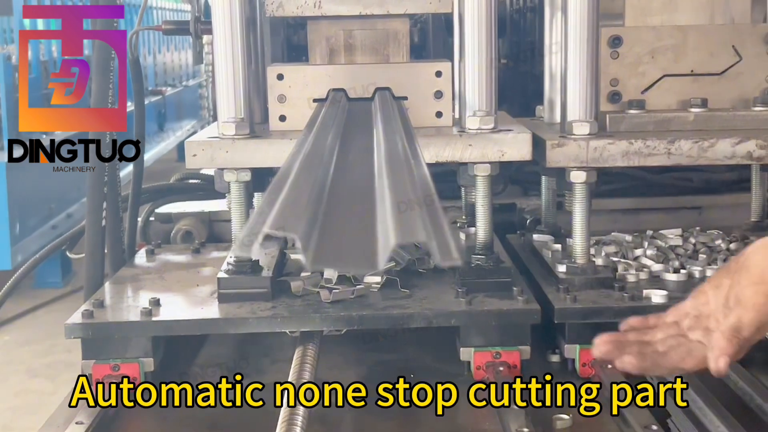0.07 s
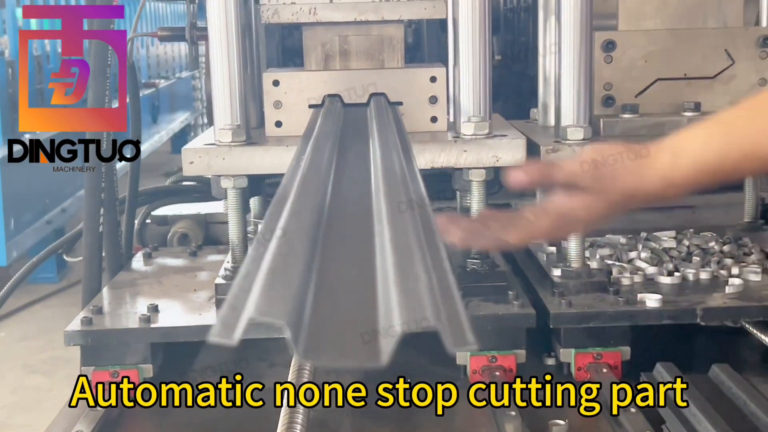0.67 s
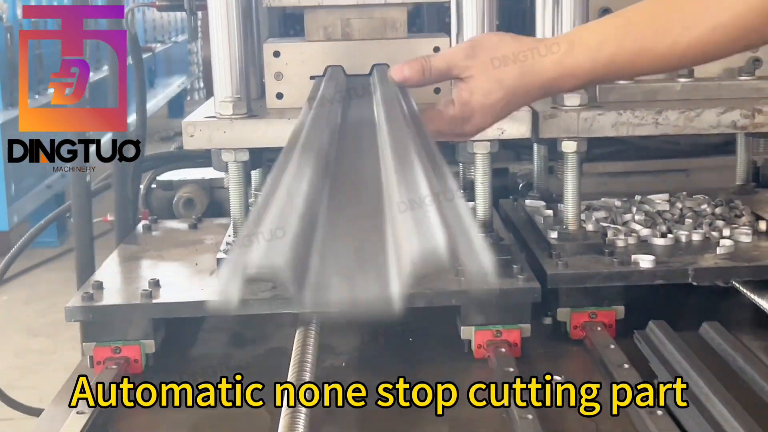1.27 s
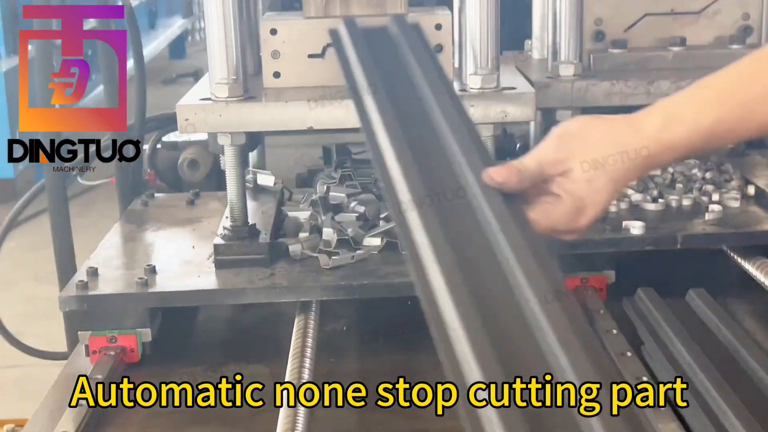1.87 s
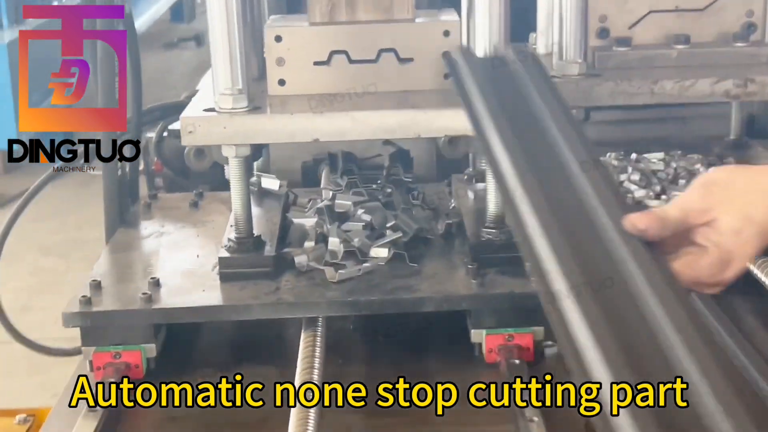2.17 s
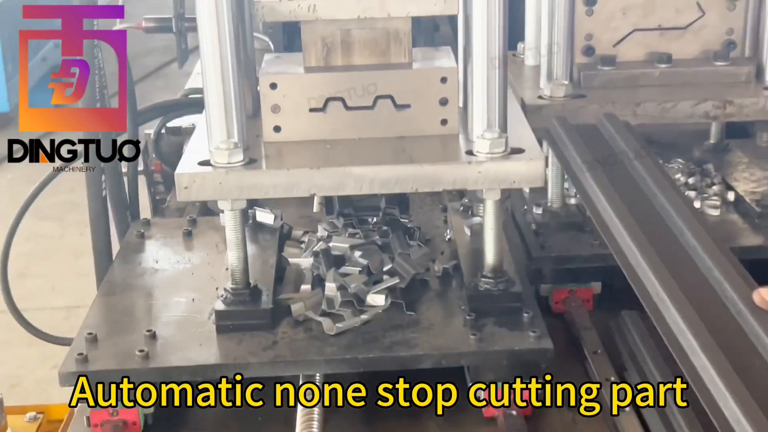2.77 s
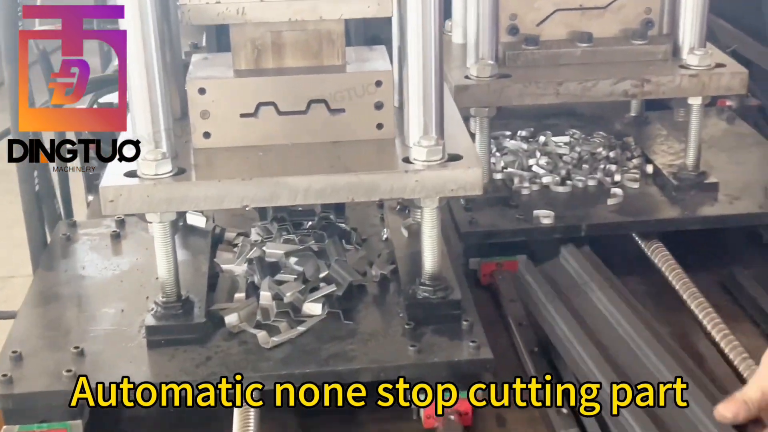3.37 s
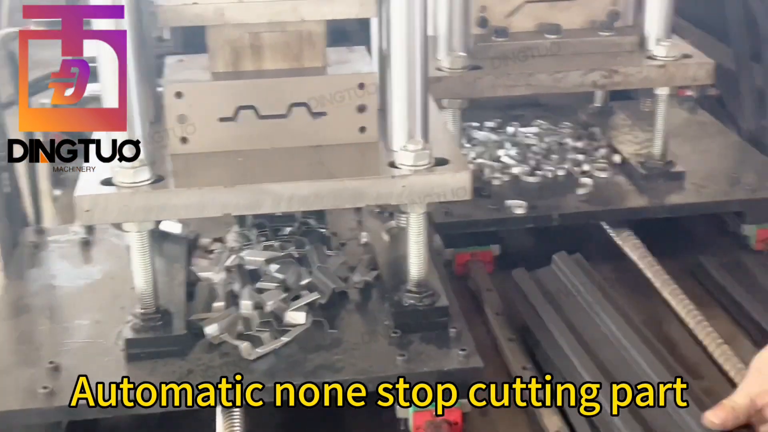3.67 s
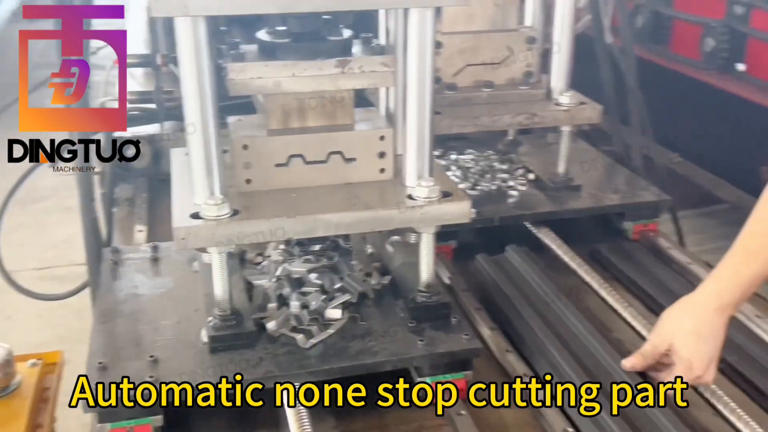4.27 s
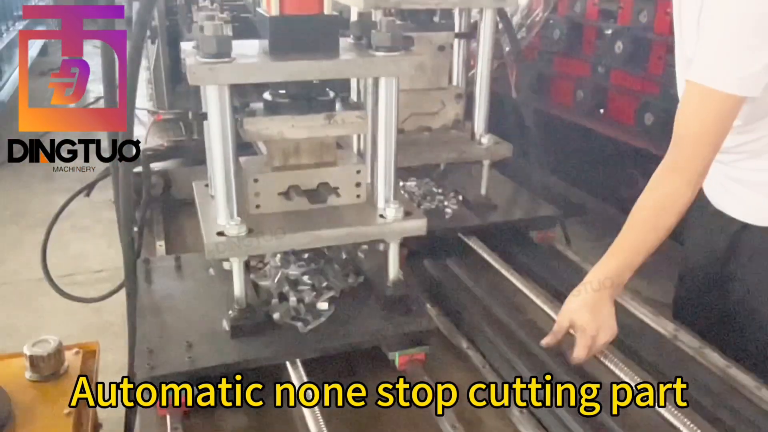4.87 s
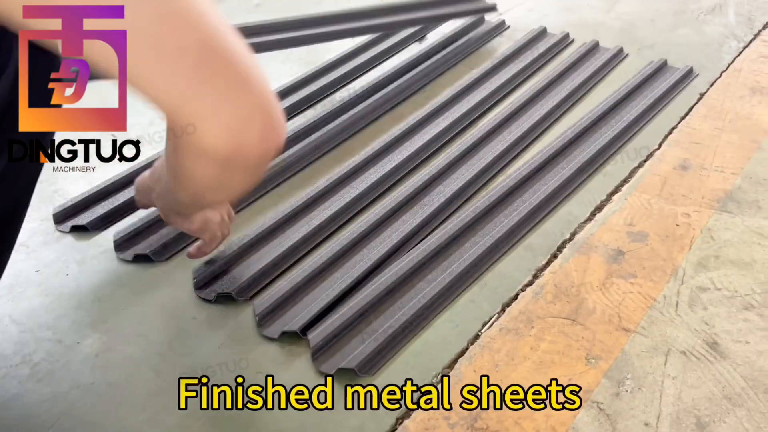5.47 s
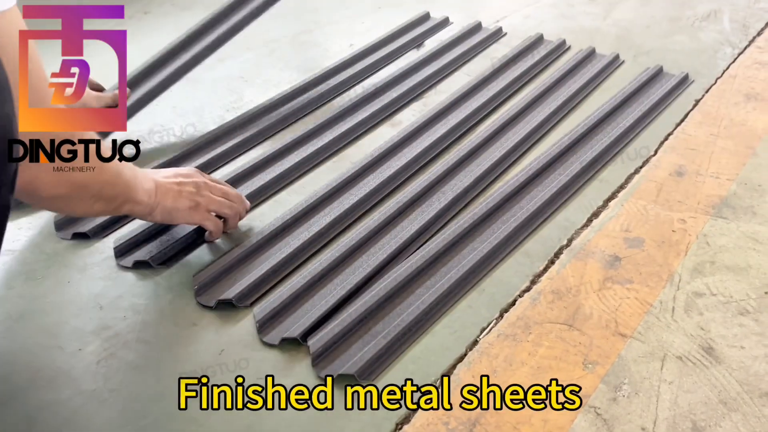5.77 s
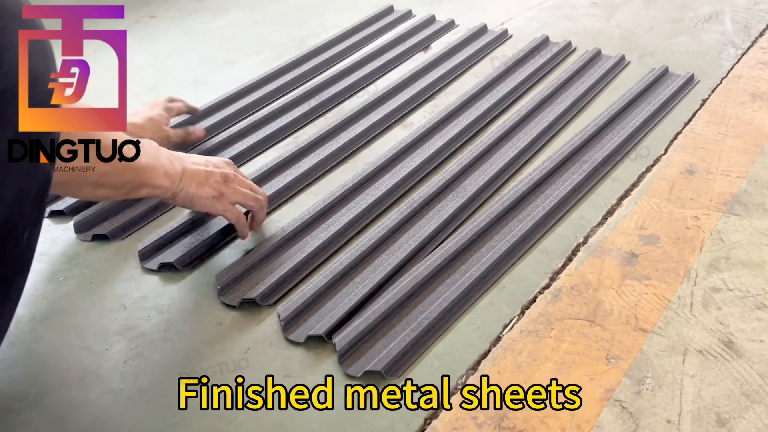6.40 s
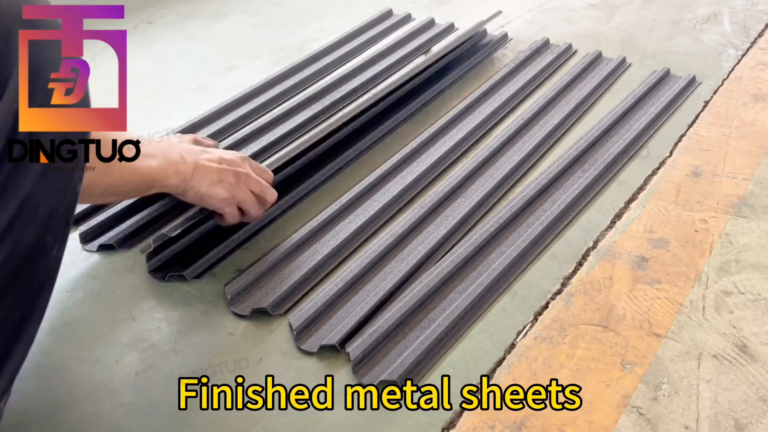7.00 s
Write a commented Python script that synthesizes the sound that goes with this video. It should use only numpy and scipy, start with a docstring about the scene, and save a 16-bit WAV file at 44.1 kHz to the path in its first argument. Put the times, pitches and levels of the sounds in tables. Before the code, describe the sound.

A machine pump drones as a press thuds through steel and metal knocks, then metal strips scrape and clatter onto concrete.

```python
"""Close to a roll forming line in a factory hall, a nine-piston pump drones and steel hisses out of the die.
The press thuds through the profile, the ram groans back up and the cut length knocks against the frame.
The pump idles while the microphone is walked to the run-out table. At 5 s the scene changes to a stack
elsewhere in the hall: profiles squeal over each other and drop on the concrete, echoing off far walls."""
import sys
import numpy as np
from scipy import signal
from scipy.fft import rfft, irfft, next_fast_len
from scipy.io import wavfile

SR = 44100
rng = np.random.default_rng(int(sys.argv[2]) if len(sys.argv) > 2 else 0)


def wav_out(sig):
    """Save sig, one row per channel (or a flat mono array), as 16-bit PCM at SR to the path in sys.argv[1]."""
    wavfile.write(sys.argv[1], SR, np.round(np.clip(np.atleast_2d(sig).T, -1, 1) * 32767).astype(np.int16))


N = 319284
TIME = np.arange(N) / SR
SHAFT_HZ, PISTONS = 24.965, 9
FEED_SLOWS_S, CUT_S = 0.45, 1.136
WALK_S, STACK_S = 3.15, 5.0   # the microphone leaves the die; it stands beside the stack

# Strong pump tones; standing waves favour different ones at each spot. Each row: multiple of shaft speed,
# then level in dB under load, idling at the die and idling at the run-out table.
PUMP_TONES = [(9, -36.5, -48, -40.5), (10, -45, -60, -55), (12, -45, -58, -52), (16, -38.5, -51, -41.5),
              (17, -48, -58, -49), (18, -40.5, -70, -39), (19, -45, -52, -47), (21, -40.5, -50.5, -47.5),
              (22, -49.5, -66, -56), (24, -51, -66, -68), (25, -51, -68, -55.5), (26, -49.5, -66, -68),
              (27, -46, -54, -47.5), (28, -47, -53, -52), (29, -49, -56, -49.5), (34, -48.5, -58, -54),
              (35, -42, -58, -49.3), (36, -47, -51, -52), (37, -62, -58, -70), (38, -51, -69, -55),
              (39, -55, -68, -56), (45, -57, -66, -53), (54, -54, -66, -57), (63, -60, -63, -70),
              (70, -47, -65, -57), (72, -49, -68, -63), (90, -61, -61, -64), (91, -54, -75, -65),
              (99, -51, -63, -59), (107, -61, -64, -68), (108, -56, -56, -56.5), (109, -57, -68, -56.5),
              (115, -53, -72, -69), (116, -52, -70, -66), (117, -52, -69, -64), (118, -53, -60, -63),
              (119, -60, -67, -71), (124, -60, -68, -69), (126, -55, -67, -66), (127, -52, -62, -68),
              (128, -56, -64, -66), (129, -56, -61, -63), (136, -59, -69, -65), (143, -55, -66, -63),
              (144, -56, -63, -62), (145, -51, -63, -63), (146, -64, -72, -62), (152, -60, -66, -68),
              (153, -58, -65, -70), (154, -51, -62, -66), (155, -50, -66, -67), (161, -56, -64, -68),
              (162, -58, -68, -68), (163, -58, -64, -67)]
# Where the pump's tones sit between the microphones. Each row: frequency in Hz, left minus right in dB.
PUMP_PAN = [(60, 0.5), (110, 0.5), (200, 5.5), (380, 2), (700, 7.5), (1290, -4.5), (2380, -0.5),
            (4400, 0.0), (8120, 0.0), (15000, 0.0)]
# When in a shaft turn a piston tone throbs. Each row: frequency in Hz, share of a turn.
THROB_AT = [(225, .4), (450, 0), (675, .54), (900, .6), (2700, .53), (3600, .4), (3825, .62), (4050, .55)]
# How far side tones stray from that step, lightening the throb. Each row: frequency in Hz, phase in cycles.
THROB_STRAY = [(225, .03), (400, .15), (550, .15), (675, .05), (900, .05), (2700, .36), (3500, .3),
               (3800, .08)]
# Thin whistles of the line. Each row: pitch in Hz, level in dB at the die and at the run-out table.
WHISTLES = [(5960, -81, -58), (7192, -80, -60), (7413, -78, -82), (11461, -78, -68), (13480, -81, -63.5)]

# Blows on steel. Each row: start in seconds, level in dB, brightness in dB per octave, ring length factor,
# resonance of the struck spot in Hz.
PRESS_BLOWS = [(1.165, -19.5, 3, 0.44, 520), (1.171, -8, -1.5, 1.3, 538), (1.192, -20.5, 4, 1.7, 226),
               (1.216, -15.5, 2, 1.25, 365), (1.227, -12.5, 2, 1.13, 143), (1.7065, -20, 3.5, 0.91, 223),
               (1.713, -19.5, 2, 0.68, 420), (1.735, -25.5, -10, 3, 62.3), (1.795, -29, -10, 1.9, 64)]
SHEAR_BLOWS = [(1.158, -24.5, 12.5, 0.64, 6000), (1.2405, -11.5, 7.5, 0.39, 2120),
               (1.258, -21.5, 4.4, 1.5, 1800)]
FRAME_KNOCKS = [(1.463, -27.5, 17, 0.84, 6900), (1.6645, -16, 4.5, 1.1, 2440),
                (1.708, -23.5, 9, 0.52, 2150), (2.0185, -22.5, 1, 0.42, 1250),
                (2.2137, -4.5, 0.5, 0.25, 2300), (2.2150, -7.5, -1, 0.18, 1070),
                (2.2205, -15.5, -1, 0.54, 2250), (2.2975, -25, -4, 0.89, 2550), (2.381, -41, -8, 1.5, 2640),
                (2.495, -34.5, -0.5, 2.3, 1340), (2.512, -29.5, -4.5, 0.89, 2560),
                (2.684, -27, -1.5, 0.9, 2470), (3.451, -28.5, -2, 1.35, 1520),
                (3.8035, -28, -2.5, 0.89, 1580), (3.830, -29, -1, 0.76, 2040),
                (3.862, -28.5, -2, 0.75, 1730), (4.315, -35.5, -3, 1.4, 1100), (4.39, -36, 0.5, 1.6, 1090)]
FLOOR_LANDINGS = [(5.783, -33.5, 7.5, 2, 6800), (5.876, -35.5, 7.5, 4.3, 6660),
                  (5.9608, -10.5, 4.5, 0.44, 1300), (5.9625, -15, -4, 0.42, 1300),
                  (5.9802, -15, 1, 0.48, 3180), (6.002, -22.5, 5, .4, 1300), (6.063, -25.5, 6, .6, 1300),
                  (6.1355, -16, 0, 0.75, 1250), (6.1535, -13, 2.5, 0.53, 2700),
                  (6.1755, -17.5, 2, 0.45, 1300), (6.1815, -8.5, -1, 0.4, 1050),
                  (6.199, -13, 2, 0.64, 2250), (6.217, -13.5, -1.5, 0.69, 1250),
                  (6.2245, -19, 2, 0.43, 1490), (6.230, -16, -2.5, 1.4, 1304),
                  (6.246, -20.5, -1, 1.0, 1350), (6.264, -21.5, 0, 1.26, 2330),
                  (6.811, -22.5, 1, 0.47, 1090), (6.8142, -19.5, 1.5, 0.72, 4020),
                  (6.8334, -22.5, 0, 0.69, 2500), (6.851, -24.5, -0.5, 0.67, 4400),
                  (6.862, -28, -3, 0.64, 1300), (6.958, -30, -2.5, 0.59, 2370), (7.061, -26, -8, 1.3, 860),
                  (7.101, -27.5, .5, .76, 1800), (7.1212, -17.5, -1.5, 0.51, 1970),
                  (7.129, -25, 1, 0.52, 1300), (7.141, -22.5, 0, 0.73, 1960)]
# Hydraulic strokes, ram up and then carriage back. Each row: at speed and stopping in seconds,
# groan level in dB, frame rumble level in dB.
STROKES = [(1.303, 1.636, -28, -29.5), (1.83, 1.95, -34.5, -30.5)]
# Spells of friction. Each row: at full strength and letting go in seconds, level in dB.
CUT_END_RUBS = [(1.492, 1.53, -36.5), (1.596, 1.66, -28.5), (1.86, 2.186, -40)]
EDGE_SQUEALS = [(4.997, 5.05, -37), (5.12, 5.22, -50), (5.286, 5.467, -38.5), (5.585, 5.606, -40)]

# Spectra as heard from close by. Each row: frequency in Hz, relative level in dB.
BUZZ_COLOUR = [(1200, -17), (1500, 5), (1800, 10), (2200, 0.5), (3000, 4), (3800, -4), (4400, -1.5),
               (6000, -12)]   # the pump's weak high tones
RATTLE_COLOUR = [(3300, -38), (3580, 5), (3720, -7), (3900, -1), (4100, -2), (4300, -32)]   # a loose part on the pump
OIL_COLOUR = [(1200, -7), (1800, 1), (2500, 1), (3200, -2), (4500, -5.5), (6000, -17)]   # oil rushing through the valves
FEED_COLOUR = [(1200, -8.5), (1800, 0), (3000, -2), (5000, -1), (7500, 0.5), (10000, -7), (12500, -6.5),
               (15000, -10.5)]   # steel in the die
PRESS_COLOUR = [(30, -25), (60, 1), (130, 8.5), (300, 3.5), (520, 5.5), (750, 0), (1200, -8), (2500, -20),
                (6000, -50), (14000, -46)]   # dense modes of the press
KNOCK_COLOUR = [(300, -34), (600, 0), (950, -3.5), (1600, -5), (2300, 2.5), (3300, -4), (4500, -5.5),
                (6500, -14.5), (10000, -21), (14000, -23)]   # dense modes of the cut length
DROP_COLOUR = [(120, -29), (300, -18), (600, -9.5), (1000, -4), (1300, -2), (1800, -7), (2600, -7),
               (4500, -18), (7500, -20), (10000, -27), (14000, -20.5)]   # dense modes of a dropped profile
RUMBLE_COLOUR = [(25, -34), (40, -20), (60, 2), (90, -11.5), (170, -18.5), (350, -4.5), (550, -10),
                 (900, -30), (2000, -21.5)]   # the shaking frame
RUB_COLOUR = [(500, 1), (900, -16), (1600, 2), (2400, 0.5), (2900, -14), (4400, -10), (6000, -12.5),
              (14000, -27)]   # the cut end scraping
LINE_ROOM_TONE = [(25, -27), (40, -6.5), (60, 7.5), (100, -3.5), (220, -2.5), (330, -2.5), (500, -0.5),
                  (800, -3.5), (1100, -6), (2200, -10.5), (3600, -19.5), (5000, -19.5), (9000, -23.5),
                  (12500, -20), (15000, -25)]   # the hall beside the machine
STACK_ROOM_TONE = [(25, -19), (45, -9), (80, 2.5), (120, 4.5), (165, -4), (225, 3), (380, 1.5), (700, -2),
                   (1300, -3.5), (2500, -11.5), (5000, -24), (9000, -30), (13000, -30.5), (15000, -32)]   # the hall beside the stack

# Clear modes of the steel. Each row: frequency in Hz, relative level in dB, nominal t60 in seconds.
PRESS_MODES = [(65.5, -12, 0.22), (126, -1.5, 0.11), (226, -0.5, 0.14), (365.5, -8.5, 0.23),
               (510.4, -2, 0.12)]
CLAMPED_MODES = [(880, 1.5, 0.22), (1233, -5.5, 0.3), (1620, 2, 0.17), (1960, -8.5, 0.14), (2373, -15, 0.2),
                 (2510, -28, 0.35), (2580, -22, 0.25), (4050, -37, 0.18), (4760, -23, 0.23)]   # the profile held in the die
KNOCK_MODES = [(876, -3, 0.15), (1240, -5, 0.2), (1328, -1, 0.19), (1028, -10, 0.14), (1550, -20, 0.2),
               (2080, -14, 0.08), (3310, -12, 0.09), (2230, -20, 0.1), (2520, -13, 0.18), (2570, 1, 0.091),
               (4140, -9, 0.18)]
RUB_MODES = [(682, -0.5, 0.17), (863, -1, 0.18), (1140, -16, 0.24), (1235, -3, 0.2), (1300, -4, 0.18),
             (1615, -6, 0.17), (2340, -5.5, 0.11)]
SQUEAK_MODES = [(2140, -6.5, 0.053), (2500, -6, 0.041), (3240, -22.5, 0.097)]
DROP_MODES = [(1306, -5, 0.12), (1350, -3, 0.17), (1588, -6, 0.12), (1846, -7, 0.1), (2030, -7, 0.13),
              (2440, -9, 0.19), (2790, -10, 0.1), (3217, -7, 0.098), (3530, -17, 0.12), (4120, -17, 0.22),
              (4520, -17, 0.11), (5220, -26, 0.23), (7040, -31, 0.2), (8230, -27, 0.25)]
SLIDE_MODES = [(1387, 6, 0.15), (2860, -5, 0.21), (5030, -18, 0.18), (5190, -12, 0.23), (5750, -30, 0.11),
               (7040, -21, 0.12)]

# How alike the two microphones hear near sources and the diffuse hall.
# Each row: frequency in Hz, likeness from 0 to 1.
NEAR_LIKENESS = [(60, .997), (130, .985), (290, .88), (640, .82), (1400, .8), (3000, .95), (7000, .9),
                 (15000, .85)]
DIFFUSE_LIKENESS = [(60, 0.98), (130, 0.98), (290, 0.89), (640, 0.2), (1400, 0), (3000, 0.46), (7000, 1),
                    (15000, 1)]
# The two microphone ports. Each row: frequency in Hz, left minus right in dB, left's lead in radians.
PORT_MISMATCH = [(100, 0, 0), (398, .5, 0.26), (700, 1, 0.67), (870, 4, 1), (1250, 0.5, 1.04),
                 (1464, -2.5, 2), (1520, -8, 3.5), (1670, -3, 5), (1900, -0.5, 6.5), (2500, 0.5, 6.5),
                 (3980, 0.5, 6), (6900, -0.5, 6.5), (8470, 3.5, 5), (10540, -11, 1.5), (11830, 10, 1.73),
                 (12000, -2, 0.2), (13400, -1, 1.8), (14900, 0, -2.5)]


def pump():
    """Nine unequal pistons drone and buzz, a loose part rattles each turn and oil rushes under load."""
    turns = SHAFT_HZ * TIME + 0.000075 * drift(3.8)
    swell = np.cos(2 * np.pi * (turns - THROB_AT[-1][1]))
    buzz = from_db(-6 + 0.7 * swell) * pump_buzz(turns)
    rattle = from_db(-11 + 6 * (swell - 1)) * noise(RATTLE_COLOUR)
    oil = from_db(-4) * noise(OIL_COLOUR)
    # buzz and rattle drop out at the cut, then build up to their idling level
    working = held(-34, FEED_SLOWS_S, CUT_S, rise_db_per_s=37, fade_db_per_s=130)
    idling = held(-46.5, 2.0, STACK_S, rise_db_per_s=38, fade_db_per_s=129)
    return pump_drone(turns) + (working + idling) * (buzz + rattle) + working * oil


def pump_drone(turns, crest_order=36, crest_db=-49, crest_s=3.86, crest_half_s=0.33):
    """The strong tones follow load and microphone position; the walk crosses one standing wave's crest."""
    load, way = pump_load(), way_walked()
    orders, *spots_db = np.transpose(PUMP_TONES)
    levels_db = np.array([*spots_db, np.where(orders == crest_order, crest_db, -np.inf)])
    stray = at_hz(THROB_STRAY, orders * SHAFT_HZ)
    loaded, at_die, at_table, crest = shaft_tones(orders, levels_db, turns, stray)
    near_crest = np.exp(-((TIME - crest_s) / crest_half_s) ** 2)
    idle = (1 - way) * at_die + way * at_table + near_crest * crest
    return load * loaded + (1 - load) * idle


def pump_buzz(turns, uneven_db=5):
    """Weak, uneven shaft harmonics between and above the strong tones; rms 1."""
    orders = np.arange(11, 240)
    levels_db = at_hz(BUZZ_COLOUR, orders * SHAFT_HZ) + uneven_db * rng.standard_normal(len(orders))
    levels_db[np.isin(orders, np.transpose(PUMP_TONES)[0])] = -np.inf
    buzz, = shaft_tones(orders, [levels_db], turns, stray=0.55)
    return rms_one(buzz)


def shaft_tones(orders, levels_db, turns, stray, size=4096):
    """One wave per row of levels. Side tones near step with their piston tone throb once a turn."""
    angle, hz = np.arange(size) / size, orders * SHAFT_HZ
    piston_tone = np.round(orders / PISTONS).astype(int)
    throb_turn = at_hz(THROB_AT, piston_tone * PISTONS * SHAFT_HZ)
    phases = rng.random(size)[piston_tone] - orders * throb_turn
    phases += stray * rng.uniform(-1, 1, len(orders))
    partials = np.array([sine_pair(f, angle / SHAFT_HZ, phase) for f, phase in zip(hz, phases)])
    partials *= from_db(np.outer(at_hz(PUMP_PAN, hz), [.5, -.5]))[:, :, None]
    cycles = np.einsum("sk,kcn->scn", np.sqrt(2) * from_db(levels_db), partials)
    return [np.array([np.interp(turns % 1, angle, side) for side in cycle]) for cycle in cycles]


def feed():
    """Steel hisses through the die, slows and creeps on until the cut."""
    running = held(-27, 0.18, FEED_SLOWS_S, rise_db_per_s=23, fade_db_per_s=44.5)
    creeping = held(-50, 0.18, CUT_S, rise_db_per_s=23, fade_db_per_s=60)
    return (running + creeping) * from_db(0.4 * drift(155)) * noise(FEED_COLOUR)


def press():
    """The heavy press thuds, and the clamped profile rings as the blade breaks through."""
    thuds = blows(PRESS_BLOWS, PRESS_COLOUR, PRESS_MODES, t60=0.19, damping=0.081,
                  modes_db=0.5, spot_db=-3)
    shear = blows(SHEAR_BLOWS, KNOCK_COLOUR, CLAMPED_MODES, t60=0.21, damping=0.13,
                  modes_db=7.5, spot_db=14)
    return thuds + shear


def knocks():
    """The cut length knocks on the frame as it is lifted away."""
    return blows(FRAME_KNOCKS, KNOCK_COLOUR, KNOCK_MODES, t60=0.1, damping=0.05,
                 modes_db=-7, spot_db=13, detune=0.0177, choke_db=-7.5)


def drops(chatter_s=0.05, chatter_db=-16, edge_hz=3200):
    """Profiles land on concrete and rock; loose edges touch twice, lightly, after each landing."""
    chatter = [(start + chatter_s * when, db + chatter_db, tilt, length, edge_hz * 2 ** (2 * where - 1))
               for start, db, tilt, length, _ in FLOOR_LANDINGS for when, where in rng.random((2, 2))]
    return blows(FLOOR_LANDINGS + chatter, DROP_COLOUR, DROP_MODES, t60=0.15, damping=0.22,
                 modes_db=-7, spot_db=6.5, detune=0.013, crack_db=8.5, vary_db=4.5)


def blows(events, colour, modes, t60, damping, modes_db, spot_db,
          detune=0, crack_db=-3, vary_db=2, choke_db=0, size=16384):
    """Each blow rings dense modes, the treble dying first, the struck spot and a few clear modes."""
    out, t, hz = np.zeros((2, N + size)), np.arange(size) / SR, np.fft.rfftfreq(size, 1 / SR)
    band_hz = np.geomspace(60, 15360, 5)
    shares = np.array([np.interp(np.log(hz + 1), np.log(band_hz), row) for row in np.eye(len(band_hz))])
    body = colour_gain(colour, hz)
    for start, db, tilt_db, length, spot_hz in events:
        spot = 1 + from_db(spot_db) / (1 + (np.log((hz + 1) / spot_hz) / 0.055) ** 2)
        struck = body * from_db(tilt_db * np.log2((hz + 1) / 1000)) * spot
        bands = irfft(noise_bins(hz, NEAR_LIKENESS) * struck * shares[:, None], size)
        band_t60 = max(t60 * length, 1e-3) * (band_hz / 1000) ** -damping
        onset_rms = bands.sum(0)[:, :int(band_t60[2] * SR / 4) + 2].std()
        hit = (bands * decay(t, band_t60[:, None, None])).sum(0) / onset_rms
        hit *= 1 + from_db(crack_db) * np.exp(-t / 0.00046)   # the contact itself cracks briefly
        emphasis = struck / (body + 1e-12) * np.sqrt(np.sum(body ** 2) / np.sum(struck ** 2))
        choke = from_db(choke_db * max(1 - length, 0))   # a piece pressed against the frame rings less
        for mode_hz, mode_db, mode_t60 in modes:
            strength = from_db(modes_db + mode_db + vary_db * rng.standard_normal())
            strength *= choke * np.interp(mode_hz, hz, emphasis)
            pitch = mode_hz * (1 + detune * rng.standard_normal())   # shifts with how the piece is held
            hit += strength * sine_pair(pitch, t) * decay(t, mode_t60 * np.sqrt(length))
        at = int(start * SR)
        out[:, at:at + size] += from_db(db) * hit * (1 - np.exp(-t / 0.00059))
    return out[:, :N]


def ram(groan_hz=131):
    """The returning cylinders groan and shake the frame."""
    groaning = sum(held(db, start, stop, 260, 79) for start, stop, db, _ in STROKES)
    shaking = sum(held(db, start, stop, 212, 32) for start, stop, _, db in STROKES)
    groan = np.sqrt(2) * sine_pair(groan_hz, TIME + 0.00024 * drift(10.9))
    shudder = from_db(-0.5 * drift(24.4))
    return groaning * shudder * groan + shaking * noise(RUMBLE_COLOUR)


def strain():
    """The piston tone swells while the pump pulls the blade out of the cut."""
    pulling = held(-29, 1.2, 1.466, rise_db_per_s=296, fade_db_per_s=214)
    return pulling * np.sqrt(2) * sine_pair(PISTONS * SHAFT_HZ, TIME)


def rub(judder_db=3):
    """The cut end scrapes along blade and frame, which sets its modes singing."""
    pressing = sum(held(db, start, stop, 218, 117) for start, stop, db in CUT_END_RUBS)
    return pressing * from_db(judder_db * drift(120)) * noise(RUB_COLOUR, RUB_MODES)


def squeak(at_s=1.669, half_s=0.0032, pitch_hz=2360, peak_db=-5):
    """The cut end sticks and slips off the blade in a few milliseconds, then rings on."""
    slip = from_db(peak_db) * np.exp(-((TIME - at_s) / half_s) ** 2) * sine_pair(pitch_hz, TIME)
    since = np.maximum(TIME - at_s + half_s, 0)
    ring = sum(from_db(db) * decay(since, t60) * sine_pair(hz, since) for hz, db, t60 in SQUEAK_MODES)
    return slip + np.minimum(since / half_s, 1) * ring


def slide(easing_db_per_s=10.5, shrill_hz=5200):
    """One profile hisses and sings along another as the push eases; its edge catches and squeals."""
    friction = noise([(1000, 1), (2400, 0.5), (4800, -1), (6000, -2), (14000, -15.5)], SLIDE_MODES)
    push_db = -36.5 - easing_db_per_s * (TIME - STACK_S)
    push = held(push_db, STACK_S, 5.78, rise_db_per_s=2000, fade_db_per_s=37)
    judder = from_db(2 * drift(90))
    catching = sum(held(db, start, stop, 400, 210) for start, stop, db in EDGE_SQUEALS)
    squeal = np.sqrt(2) * sine_pair(SLIDE_MODES[0][0], TIME + .0001 * drift(40))
    hard_push = held(-51, STACK_S, 5.27, rise_db_per_s=2000, fade_db_per_s=150)
    shrill = sine_pair(shrill_hz, TIME + .00005 * drift(120)) * from_db(3 * drift(30))
    return push * judder * friction + catching * squeal + hard_push * shrill


def motor_drive(switching_hz=5911):
    """The drive whines at its switching rate, louder under load, and faintly about an octave above."""
    way = way_walked()
    fizz = from_db(-1) * noise([(5700, -40), (5920, 2), (6100, 20), (6300, -55)])
    octave = from_db(-63.5 + 2.5 * way) * noise([(11700, -47), (12150, -5), (12600, -63)])
    level = from_db(-60 + 10 * pump_load() + 3 * drift(56)) * (1 - 0.25 * way)
    return level * (sine_pair(switching_hz, TIME) + fizz) + octave


def whistles(hum_hz=216.5, hum_db=-51):
    """Thin whistles waver in pitch above the machine; a second hum beats against the piston tone."""
    way = way_walked()
    thin = sum(from_db(die_db + way * (table_db - die_db)) * sine_pair(hz, TIME + .22 * drift(80) / hz)
               for hz, die_db, table_db in WHISTLES)
    return np.sqrt(2) * (thin + from_db(hum_db) * sine_pair(hum_hz, TIME))


def hall_echo(x, t60=1, wet_db=-6):
    """A diffuse, dull tail from far walls."""
    t = TIME[:SR]
    tail = rng.standard_normal((2, len(t))) * decay(t, t60) * (1 - np.exp(-t / 0.0026))
    tail /= np.sqrt(np.sum(tail ** 2, axis=1, keepdims=True))
    tail = signal.sosfilt(signal.butter(1, 4000, fs=SR, output="sos"), tail)
    return from_db(wet_db) * signal.fftconvolve(x, tail, axes=1)[:, :N]


def room_tone(colour, db):
    """The hall's diffuse noise, reaching the microphone from all round."""
    return from_db(db) * noise(colour, likeness=DIFFUSE_LIKENESS)


def pump_load(unload_s=0.2):
    """Full load until the cut, then the pressure sinks away; 1 to 0."""
    return np.exp(-np.maximum(TIME - CUT_S, 0) / unload_s)


def way_walked():
    """The microphone's even walk from the die (0) to the run-out table (1)."""
    return np.clip((TIME - WALK_S) / (STACK_S - WALK_S), 0, 1)


def held(db, full_s, end_s, rise_db_per_s, fade_db_per_s):
    """Gain that rises to a level, holds it and fades."""
    early, late = np.maximum(full_s - TIME, 0), np.maximum(TIME - end_s, 0)
    return from_db(db - rise_db_per_s * early - fade_db_per_s * late)


def decay(t, t60):
    """Gain that falls 60 dB in t60 seconds."""
    return np.exp(-np.log(1000) * t / t60)


def drift(rate):
    """Random wander with spread about 1, taking a new value rate times a second."""
    knots = rng.standard_normal(2000)
    return np.interp(TIME * rate, np.arange(len(knots)), knots)


def sine_pair(hz, t, phase=None):
    """One partial at both microphones, with a small chance phase between them; phase in cycles."""
    apart = np.arccos(at_hz(NEAR_LIKENESS, hz)) * rng.standard_normal()
    phase = rng.random() if phase is None else phase
    return np.sin(2 * np.pi * (hz * t + phase) + np.array([[0], [apart]]))


def noise(colour, modes=(), likeness=NEAR_LIKENESS):
    """Steady stereo noise of a colour, ringing in any modes given; rms 1."""
    size = next_fast_len(N)
    hz = np.fft.rfftfreq(size, 1 / SR)
    gain = colour_gain(colour, hz)
    for mode_hz, db, t60 in modes:
        gain += from_db(db + 17.5) / np.hypot(1, (hz - mode_hz) * t60 / 2)
    return rms_one(irfft(noise_bins(hz, likeness) * gain, size)[:, :N])


def noise_bins(hz, likeness):
    """Spectrum of white noise at two microphones of a given likeness."""
    mid, side = rng.standard_normal((2, len(hz))) + 1j * rng.standard_normal((2, len(hz)))
    alike = np.clip(at_hz(likeness, hz), 0, 1)
    return np.sqrt(1 + alike) * mid + np.sqrt(1 - alike) * side * [[1], [-1]]


def colour_gain(colour, hz):
    """Gain of a spectrum that falls away beyond its ends."""
    low, high = colour[0][0], colour[-1][0]
    return from_db(at_hz(colour, hz)) * np.minimum(hz / low, 1) ** 2 * (high / np.maximum(hz, high)) ** 2


def at_hz(points, hz):
    """A table read on a log-frequency axis."""
    table_hz, values = np.transpose(points)
    return np.interp(np.log(hz + 1e-9), np.log(table_hz), values)


def from_db(db):
    return 10 ** (np.asarray(db) / 20)


def rms_one(x):
    return x / np.sqrt(np.mean(x ** 2) + 1e-20)


def microphone_ports(x):
    """Two unlike ports resonate apart: each side gets half of their difference in level and phase."""
    size = next_fast_len(N + SR)
    hz = np.fft.rfftfreq(size, 1 / SR)
    table, halves = np.array(PORT_MISMATCH), np.array([[.5], [-.5]])
    level_db, lead = at_hz(table[:, [0, 1]], hz), at_hz(table[:, [0, 2]], hz)
    return irfft(rfft(x, size) * from_db(halves * level_db) * np.exp(1j * halves * lead), size)[:, :N]


def scene():
    """The microphone is first beside the line, then beside the stack of profiles."""
    cutter = press() + knocks() + ram() + strain() + rub() + squeak()
    room_db = -43.5 + 8 * pump_load() + 5.5 * way_walked()
    line = pump() + feed() + cutter + motor_drive() + whistles() + room_tone(LINE_ROOM_TONE, room_db)
    landings = drops()
    stack = landings + slide() + hall_echo(landings) + room_tone(STACK_ROOM_TONE, db=-33)
    stack *= from_db([[.5], [-.5]])   # slightly to the left
    at_stack = np.clip((TIME - STACK_S) / .01 + .5, 0, 1)   # 10 ms crossfade
    return (1 - at_stack) * line + at_stack * stack


def record(dry, ceiling=1.2, cutoff_hz=15200):
    """A stereo microphone with unlike ports; peaks are rounded, the top is cut."""
    rounded = ceiling * np.tanh(microphone_ports(dry) / ceiling)
    return signal.sosfilt(signal.ellip(10, .2, 80, cutoff_hz, fs=SR, output="sos"), rounded)


dry = scene()
out = record(dry)
wav_out(out)
```